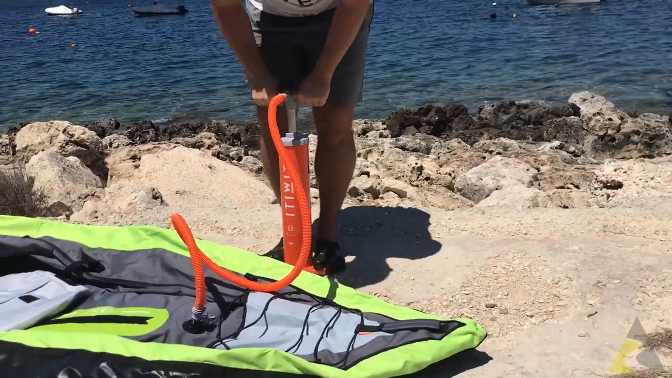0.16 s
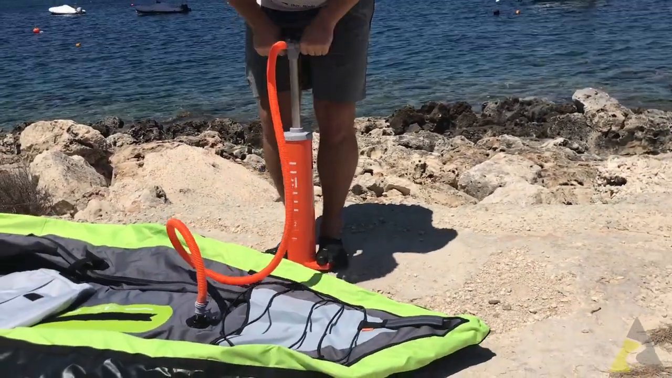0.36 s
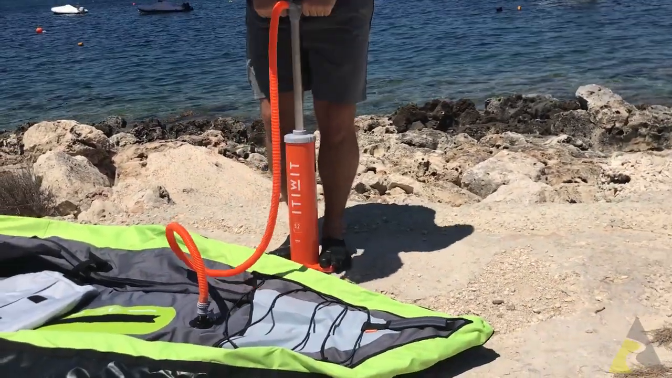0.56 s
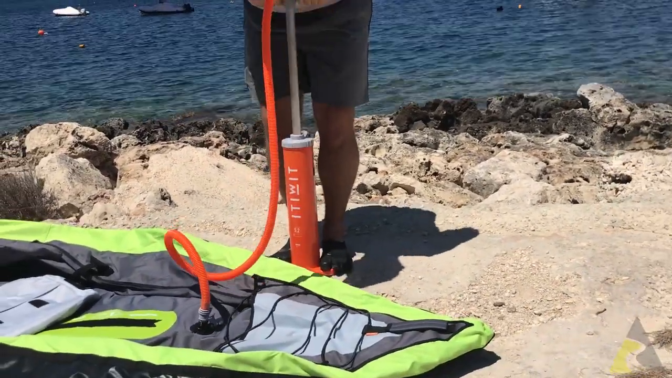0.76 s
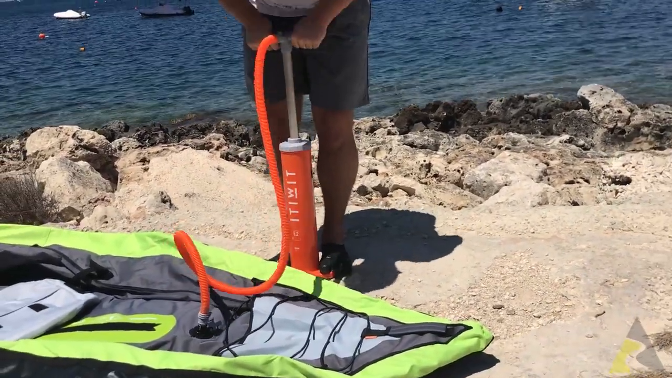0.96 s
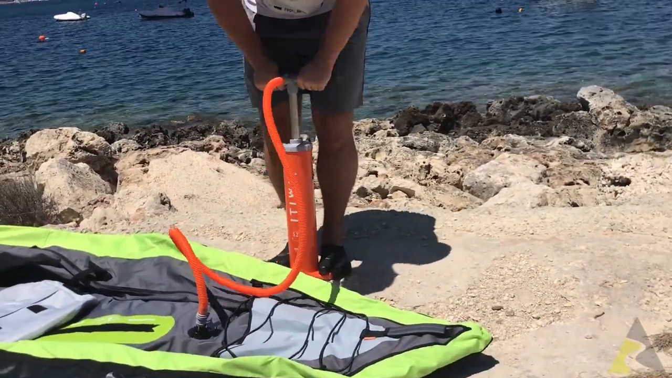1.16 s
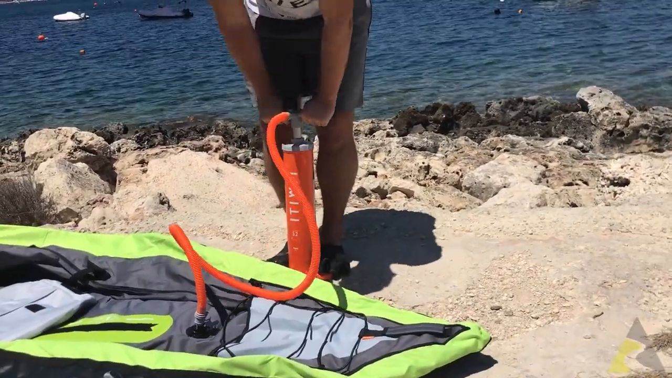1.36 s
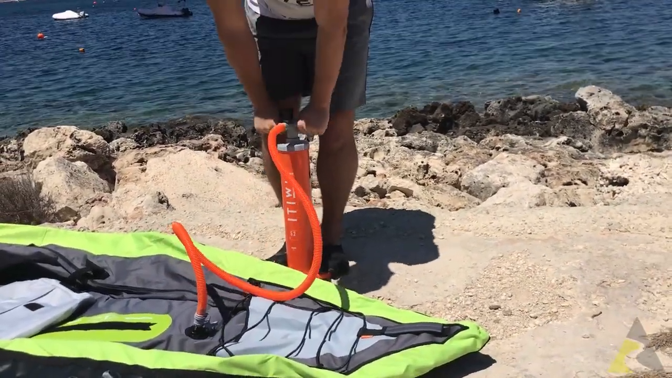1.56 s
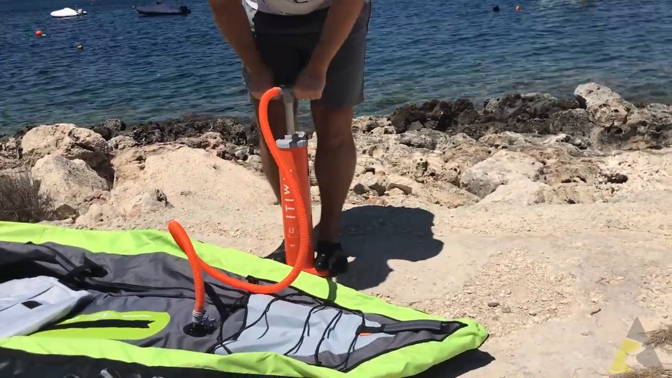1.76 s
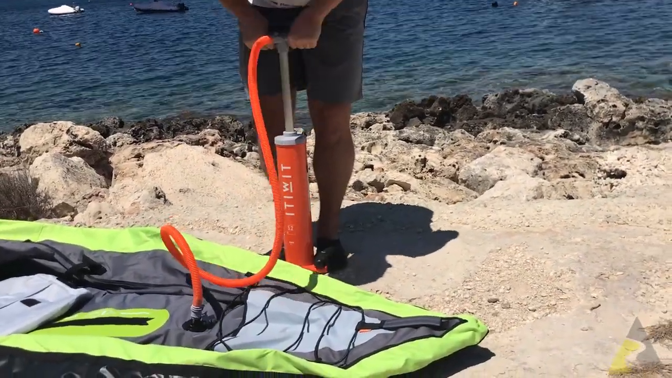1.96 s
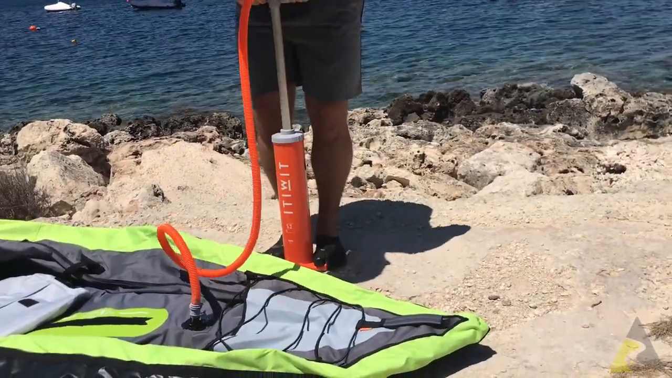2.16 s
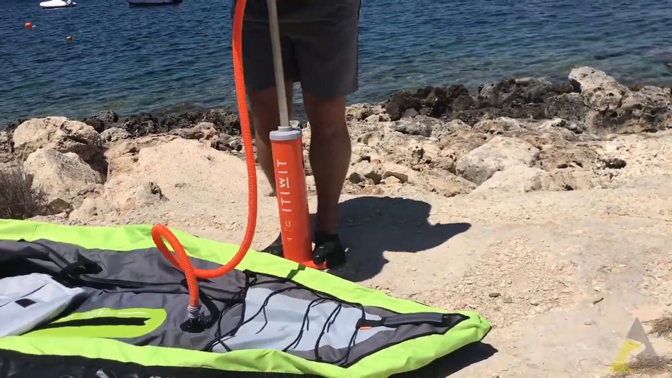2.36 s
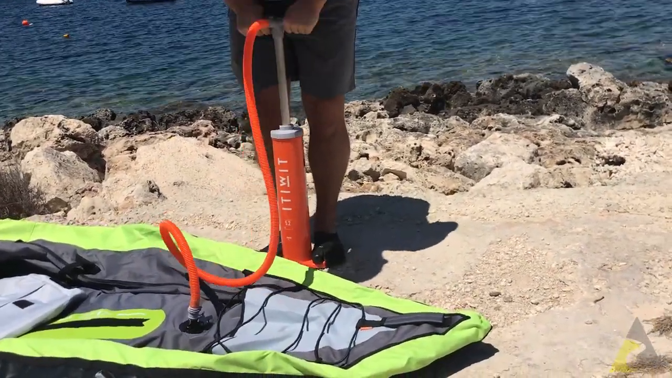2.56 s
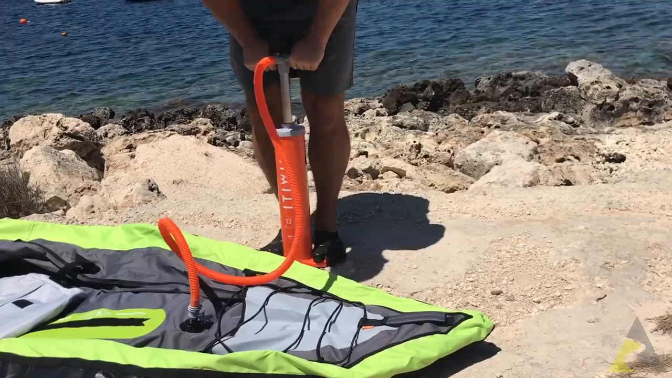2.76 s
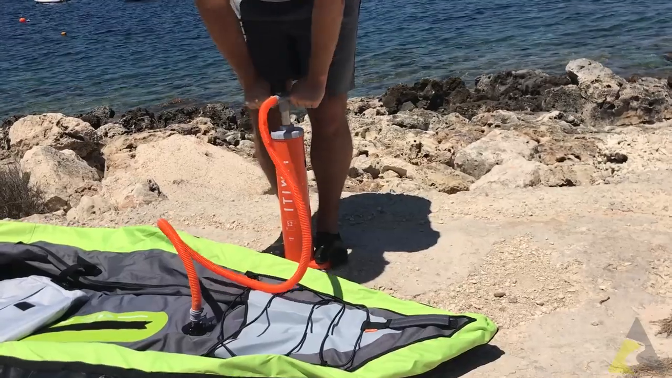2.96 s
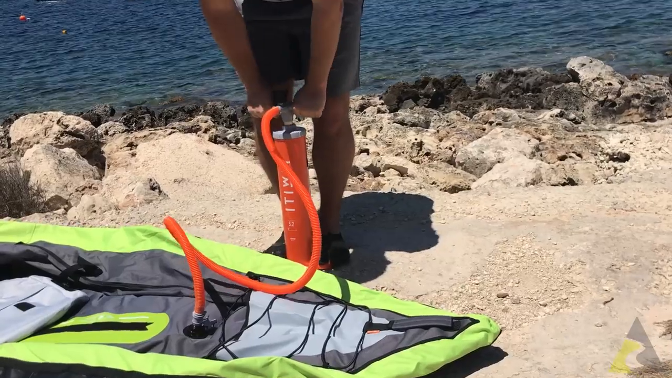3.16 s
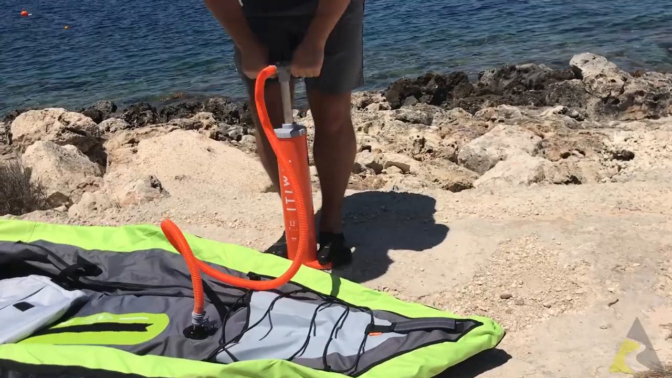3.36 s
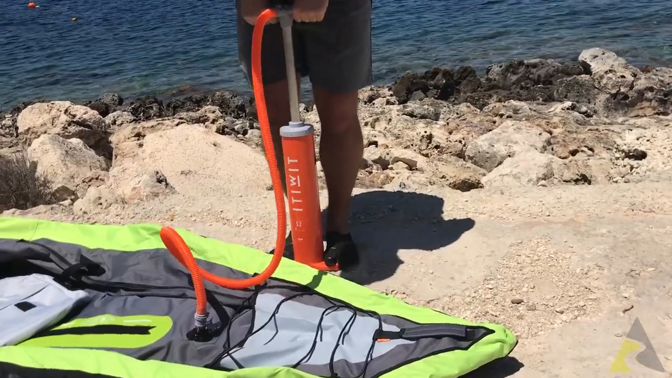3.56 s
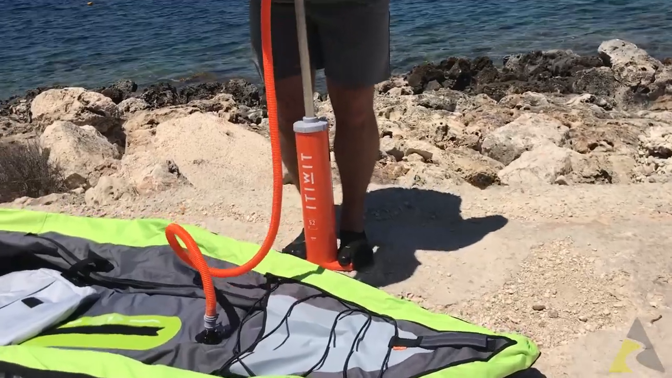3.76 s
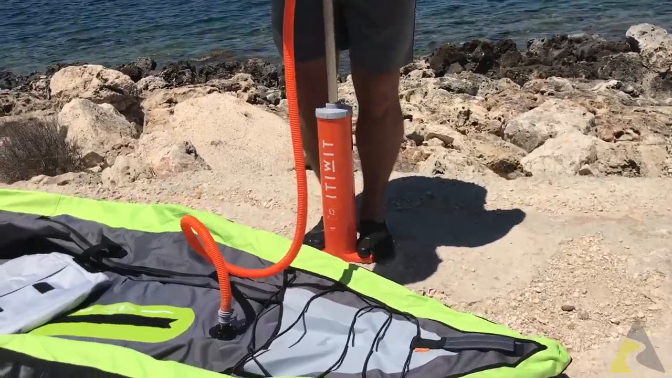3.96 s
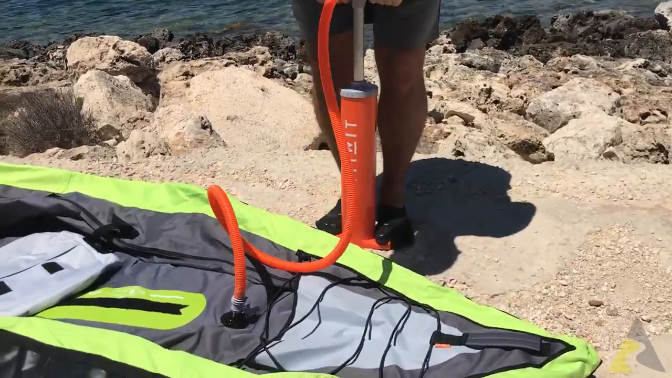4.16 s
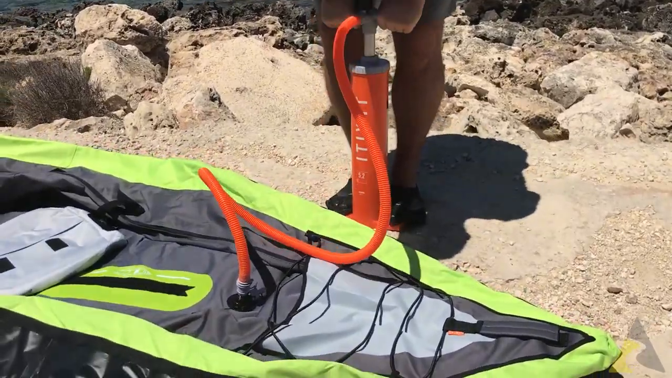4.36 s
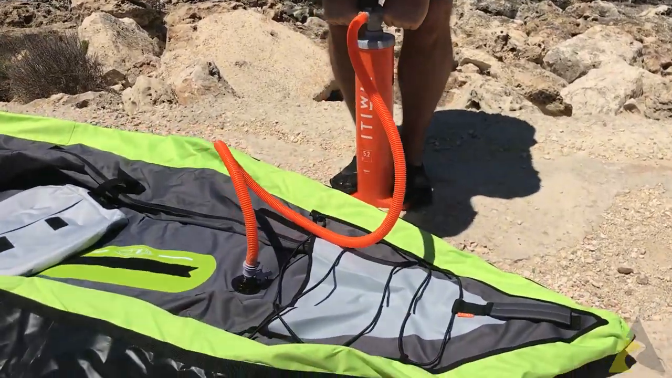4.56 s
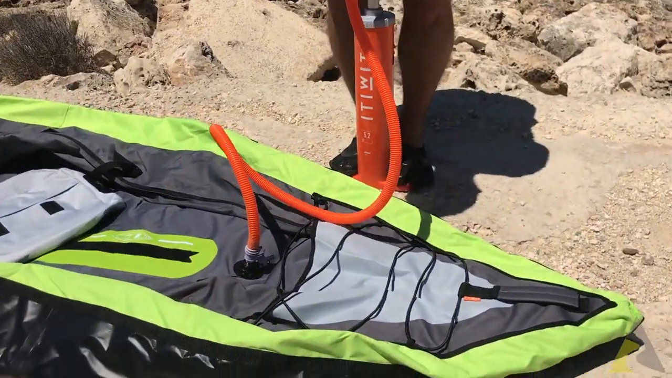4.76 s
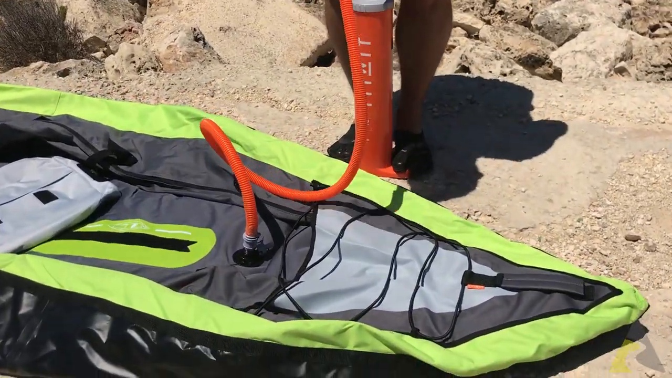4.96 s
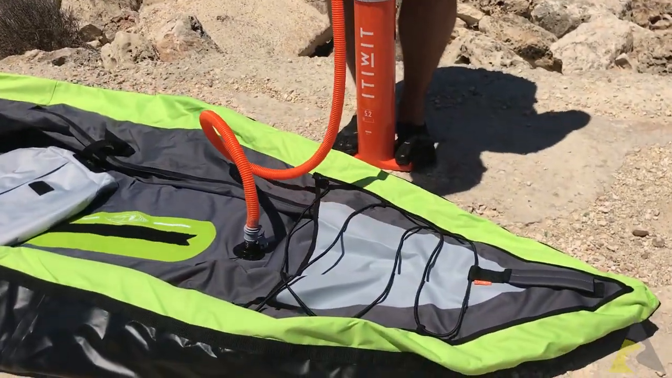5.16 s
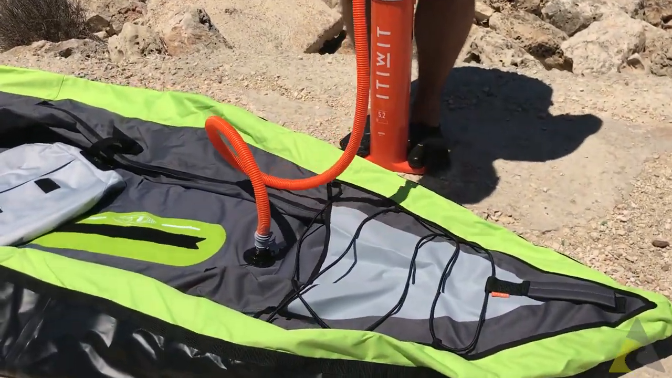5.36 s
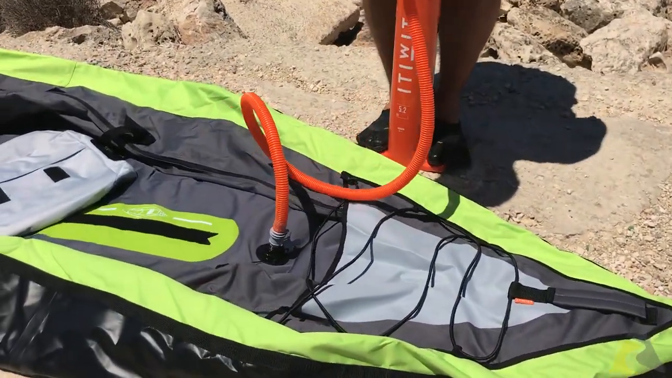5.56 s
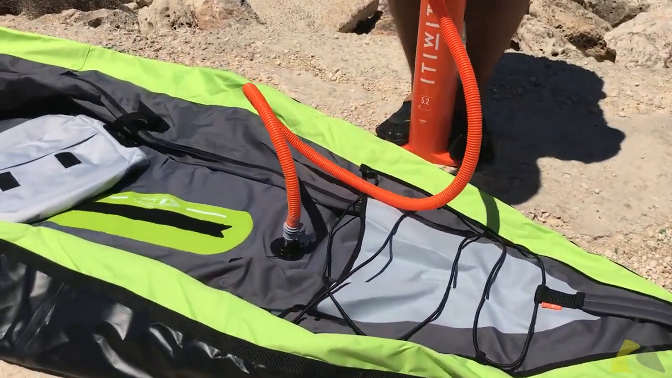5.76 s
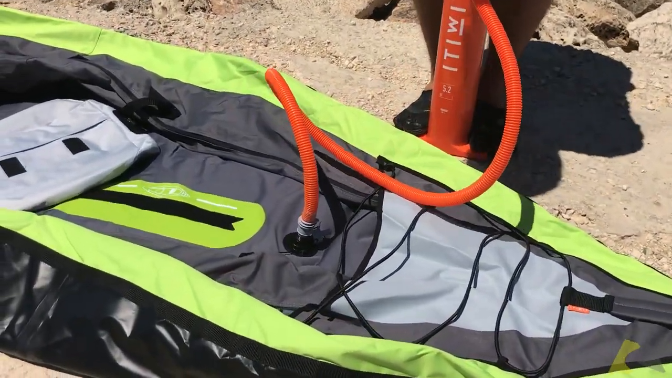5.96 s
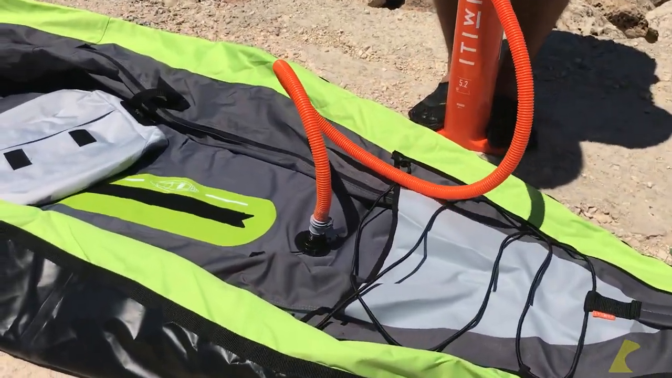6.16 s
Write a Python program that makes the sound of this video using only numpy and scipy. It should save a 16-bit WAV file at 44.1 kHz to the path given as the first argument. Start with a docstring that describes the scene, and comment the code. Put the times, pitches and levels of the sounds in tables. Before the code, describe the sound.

A hand pump fills an inflatable boat with steady, whistling hisses of air and light knocks, as wind rumbles on the microphone.

```python
"""A double-action hand pump fills an inflatable boat on a breezy shore, heard by one microphone.
Every push and pull drives air through the hollow piston rod and a flap valve. Swirls of air (eddies)
make the rod sing like a pipe, over hiss and brief whistles. The flap ticks shut and pops open, and the
piston knocks at the ends of its travel. Wind buffets the microphone over a faint wash of sea."""
import sys
import numpy as np
from scipy import signal
from scipy.fft import rfft, irfft
from scipy.io import wavfile
from scipy.ndimage import uniform_filter1d, map_coordinates

SR = 44100
rng = np.random.default_rng(int(sys.argv[2]) if len(sys.argv) > 2 else 0)


def wav_out(sig):
    """Save sig, one row per channel (or a flat mono array), as 16-bit PCM at SR to the path in sys.argv[1]."""
    wavfile.write(sys.argv[1], SR, np.round(np.clip(np.atleast_2d(sig).T, -1, 1) * 32767).astype(np.int16))


N = 273420

# One row a stroke, pushes and pulls in turn. "Jet" is the fast stream of air.
# (piston starts [s], valve opens [s], hardest effort [s], easing off [s], piston stops [s],
#  jet at opening [dB], jet at hardest [dB], jet at easing off [dB], jump at opening [dB],
#  base eddy pitch [Hz], pressure peak [s], fizz at that peak relative to the jet [dB],
#  brightness at opening [dB], brightness at easing off [dB], barrel noise [dB], puff near the top [dB])
STROKES = [ (-.8, -.7, -.3, 0.0, .05, -39, -33, -40, 0, 3200, -.3, -6, -6, -8, -50, -47),
           (.1, .187, .41, .72, .89, -36, -32.5, -37.5, 33, 3400, .4, -8.5, -5.5, -6, -50, -42),
           (.9, .984, 1.17, 1.5, 1.71, -38.5, -36, -41.5, 15, 3050, 1.3, -5, -9, -6.5, -51, -49),
           (1.7, 1.747, 2.0, 2.28, 2.43, -37.5, -32, -35, 28, 3330, 2.0, -10.5, -6.5, -6, -51, -47),
           (2.46, 2.54, 2.72, 3.08, 3.28, -40, -38.5, -39.5, 6, 3250, 3.02, -1, -7.5, -6.5, -52, -50),
           (3.28, 3.337, 3.6, 3.82, 3.99, -34.5, -32, -33.5, 30, 3450, 3.52, -7, -3, -6, -50, -42),
           (3.985, 4.06, 4.46, 4.61, 4.67, -38.5, -32.5, -40, 2, 3380, 4.4, -5.5, -4, -10, -48.5, -45),
           (4.72, 4.777, 5.12, 5.28, 5.44, -33, -31, -37.5, 30, 3400, 5.05, -5.5, -6, -5, -47, -42),
           (5.405, 5.48, 5.66, 6.0, 6.06, -39.5, -32, -36, 0, 3200, 5.65, -4.5, -5, -8, -47, -45),
           (6.12, 6.194, 6.4, 6.7, 6.9, -35, -32, -36, 26, 3200, 6.4, -9, -7, -6, -49, -43), ]
# Tone colour of the air jet: (frequency [Hz], level [dB])
JET_SPECTRUM = [(650, -54), (1100, -19.5), (1580, -37), (1980, -8), (2160, -12.5), (2390, -3), (2890, -5),
                (3180, -5), (3990, -3), (4780, -6), (6470, -5.5), (10600, -16), (13800, -13), (22000, -120)]

ROD_HZ, MODE_WIDTH_HZ = 297.5, 75   # spacing and width of the rod's modes, the pitches it rings at


def from_db(db):
    """Turn decibels into a number to multiply a sound by."""
    return 10 ** (np.asarray(db) / 20)


def rms_one(x):
    """Scale a signal so that its average strength (rms) is 1."""
    return x / np.sqrt(np.mean(x ** 2) + 1e-20)


def bump(at_s, width_s):
    """A bell-shaped curve in time, of height 1."""
    return np.exp(-.5 * ((np.arange(N) / SR - at_s) / width_s) ** 2)


def drift(rate_hz):
    """A smooth random wander of strength about 1; a higher rate wanders faster."""
    step = 40   # samples between random values
    r = np.exp(-2 * np.pi * step * rate_hz / SR)
    slow = signal.lfilter([1], [1, -2 * r, r * r], rng.standard_normal(N // step + 2002))[2000:]
    return np.interp(np.arange(N) / step, np.arange(len(slow)), rms_one(slow))


def turbulence(spectrum, flicker_db, bands):
    """Churning air or water: coloured noise whose bands flicker, partly together and partly alone."""
    hz, level_db = np.transpose(spectrum)
    bin_hz = np.arange(N // 2 + 1) * SR / N + 1e-3
    colour = from_db(np.interp(np.log(bin_hz), np.log(hz), level_db, -90, -90))
    shaped = rfft(rng.standard_normal(N)) * colour
    band_position = bands * np.log(bin_hz / hz[0]) / np.log(hz[-1] / hz[0])
    out, together = 0, drift(11.1)
    for k in range(bands + 1):
        band = irfft(shaped * np.clip(1 - abs(band_position - k), 0, 1), N)
        flicker = .3 * together + .7 * drift(5) + .7 * drift(18)
        out = out + band * from_db(flicker_db * flicker)
    return rms_one(out)


def ring(drive, hz, ring_s):
    """A resonance: each click in the drive starts a tone that fades by 60 dB in ring_s seconds."""
    r, w = from_db(-60 / (ring_s * SR)), 2 * np.pi * hz / SR
    return signal.lfilter([0, np.sin(w)], [1, -2 * r * np.cos(w), r * r], drive + 1e-18)


def add(out, at_s, sound):
    """Mix a short sound in at a given time."""
    i = round(at_s * SR)
    out[i:i + len(sound)] += sound[:N - i]


def sea():
    """Water washing on the shore makes a faint, wavering noise."""
    # Tone colour of the sea: (frequency [Hz], level [dB])
    wash_spectrum = [(120, -38), (200, -4.5), (456, -11.5), (538, -11), (735, -7.5), (836, -17),
                     (16000, -37)]
    return from_db(-56.5) * turbulence(wash_spectrum, flicker_db=3.0, bands=6)


def wind():
    """Wind shakes the air pressure at the microphone: a lumpy rumble with a few single thumps."""
    # Strength of the breeze: (time [s], level [dB])
    breeze = [(0, -43), (.08, -54), (.17, -37), (.4, -40), (.5, -51), (.82, -45), (1.28, -49), (1.76, -43),
              (1.93, -35), (2.07, -37), (2.28, -49), (2.84, -43), (3.2, -38), (3.29, -50), (3.4, -47),
              (3.57, -34), (3.8, -49), (4.4, -48), (4.8, -44), (5.2, -50), (5.33, -38), (5.55, -49),
              (5.92, -55), (6.2, -45)]
    # Short gusts that thump: (time [s], rise above the breeze [dB])
    gusts = [(.03, 8), (1.8, 8), (2.23, 6), (2.52, 7), (2.64, 5), (3.325, 12), (3.44, 21), (4.12, 11),
             (5.49, 7)]
    # Tone colour of the rumble: (frequency [Hz], level [dB])
    rumble_spectrum = [(13, -44), (22, -14), (71, 4.5), (139, -5), (198, -10), (300, -24), (520, -34),
                       (880, -120)]
    breeze_db = np.interp(np.arange(N) / SR, *np.transpose(breeze))
    gust_db = sum(db * bump(at_s, width_s=.015) for at_s, db in gusts)
    return from_db(breeze_db + gust_db) * turbulence(rumble_spectrum, flicker_db=2.5, bands=3)


def whistles():
    """Air whistles on its way through the pump: nearly pure tones that swell, waver and fade."""
    # Brief whistles: (start [s], end [s], pitch [Hz], level [dB])
    tones = [(3.1, 3.3, 5100, -59), (3.1, 3.34, 5250, -63), (3.11, 3.2, 9530, -54), (3.1, 3.22, 9750, -56),
             (3.92, 4.08, 5250, -59), (3.92, 4.03, 9750, -67), (4.385, 4.5, 3215, -28),
             (4.37, 4.41, 3560, -32), (3.5, 3.66, 3500, -31), (.36, .5, 3570, -34), (.6, .72, 3400, -36),
             (2.93, 3.06, 3570, -38), (1.93, 2.06, 3290, -34), (5.08, 5.2, 3560, -33),
             (4.45, 4.6, 6340, -47), (5.05, 5.2, 3125, -35), (5.68, 5.95, 3124, -33),
             (5.74, 5.92, 6340, -42)]
    out = np.zeros(N)
    waver, strength = 1 + .0032 * drift(31), from_db(1.5 * drift(30))
    for start, end, hz, level_db in tones:
        on = slice(round(start * SR), round(end * SR))
        tone = strength[on] * np.sin(2 * np.pi * np.cumsum(hz * waver[on]) / SR)
        add(out, start, from_db(level_db) * tone * signal.windows.tukey(len(tone), .6))
    return out


def valve_flap():
    """The flap ticks shut with a short ring, and bursts open with a low pop of air."""
    # The flap closing: (time [s], level [dB], pitch [Hz])
    ticks = [(0.143, -42.5, 1040), (0.897, -47, 972), (1.716, -35, 1025), (2.424, -46, 880),
             (3.99, -48, 1400), (4.741, -39.5, 1120), (5.416, -45, 1360), (6.14, -40.5, 1090)]
    # The flap opening: (time [s], level [dB])
    pops = [(0.182, -28.5), (0.984, -41), (1.742, -29), (3.332, -54), (4.774, -36.5), (6.192, -28.5)]
    out, click = np.zeros(N), signal.unit_impulse(SR // 10)
    soft_click = signal.lfilter([.12], [1, -.88], click)
    for at_s, level_db, hz in ticks:
        body = ring(soft_click, hz, .035) - .6 * ring(soft_click, 1.2 * hz, .03)
        snap = .15 * ring(click, 2.3 * hz, .012)
        add(out, at_s, from_db(level_db + 5) * (body + snap))
    pop = ring(ring(click, hz=420, ring_s=.008), hz=420, ring_s=.008)
    for at_s, level_db in pops:
        add(out, at_s + .0013, -from_db(level_db + 4) * pop / pop.max())   # minus: it starts with a dip
    return out


def piston_knocks():
    """The piston hits its stop: a sharp crack first, then the barrel's low tones a moment later."""
    # Hits on the stop: (time [s], level [dB], brightness added to the high tones [dB])
    hits = [(0.0, -22.5, 1), (0.805, -32, -47), (1.608, -33, -19), (2.334, -27.5, -15), (3.906, -33, -16.5),
            (4.621, -20.5, -6), (6.005, -14, -7)]
    # Tones the barrel rings at: (pitch [Hz], level [dB], ring time [s])
    barrel_modes = [(319, -3, 0.016), (571, -0.5, .022), (1037, -5, 0.018), (1590, 6, 0.012),
                    (2340, 12, 0.0065), (3205, 12, 0.004), (6300, 3, 0.014)]
    out, blow = np.zeros(N), np.zeros(SR // 8)
    blow[:8] = np.hanning(10)[1:-1] / 4.5
    blow[46:54] = .6 * blow[:8]   # the piston bounces once, a millisecond later
    for at_s, level_db, bright_db in hits:
        for k, (hz, mode_db, ring_s) in enumerate(barrel_modes):
            is_high = hz > 1500
            delay_s = .0006 if is_high else .0017
            gain = (-1) ** k * from_db(level_db + mode_db + bright_db * is_high)
            add(out, at_s + delay_s, gain * ring(blow, hz, ring_s))
    return out


def handle_height():
    """The handle moves between 0 (down) and 1 (up), turning in the gap between two strokes."""
    starts, stops = [row[0] for row in STROKES], [row[4] for row in STROKES]
    turns = [(stop + start) / 2 for stop, start in zip(stops, starts[1:])] + [stops[-1]]
    return np.interp(np.arange(N) / SR, turns, np.arange(len(turns)) % 2)


def ground_echo(sound, share):
    """Add a dull copy that bounces off the ground and arrives later when the handle is high."""
    down_ms, up_ms = 1.34, 2.7
    lag = (down_ms + (up_ms - down_ms) * handle_height()) * SR / 1000
    dull = signal.sosfilt(signal.butter(1, 7000, fs=SR, output="sos"), sound)
    return sound + share * map_coordinates(dull, [np.arange(N) - lag], order=3)


def pumping():
    """The strokes set the jet's level and eddy pitch, and four more levels relative to the jet."""
    still_db, jump_s, burst_s = -80.0, .004, .01   # jet at rest; valve opening time; fade of its burst
    leak_power, slowing_power = 1.3, 2.0   # how steeply the jet follows the piston's start and stop
    drain_drop_db, drain_db_per_s = 13, 135
    eddy_hz_per_db, eddy_travel_hz, eddy_lowest_hz = 22, 500, 2800
    fizz_open_db, fizz_sag_db, fizz_rest_db = -16, 2.0, -11
    leak_bright_db, push_bright_db, pull_bright_db = -2, -5, -3.5   # a pull bites harder at its peak
    burst_hz, burst_fizz_db, burst_rush_db = 400, 7, 10   # brief lifts as the valve flies open
    t, height = np.arange(N) / SR, handle_height()
    jet_db, hardest_db, eddy_hz, bright_db, fizz_db, barrel_db, pushing = np.full((7, N), still_db)
    puff_power, bursts = np.zeros((2, N))
    for k, (start, opens, hard, ease, stop, open_db, hard_db, ease_db, jump_db, base_hz, peak,
            peak_fizz_db, bright_open_db, bright_ease_db, low_db, puff_db) in enumerate(STROKES):
        on, pull = t >= start, k % 2
        lifts = opens - jump_s

        # Air gathers pace until the valve opens, dies as the piston slows, and drains from the hose.
        leak = np.clip((t - start) / (opens - start), 1e-4, 1)
        speed = np.clip((stop - t) / (stop - ease), 1e-4, 1)
        level_db = np.interp(t, [lifts, opens, hard, ease], [open_db - jump_db, open_db, hard_db, ease_db])
        level_db += 20 * np.log10(leak ** leak_power * speed ** slowing_power)
        drain_db = np.where(t > ease, ease_db - drain_drop_db - drain_db_per_s * (t - ease), still_db)
        level_db = np.maximum(level_db, drain_db)
        jet_db = np.maximum(jet_db, level_db)

        # The eddy pitch rises with a stronger jet, a higher handle and the opening burst.
        burst = (t >= lifts) * np.exp(-np.maximum(t - opens, 0) / burst_s)
        pitch_hz = base_hz + eddy_hz_per_db * (level_db - hard_db) + eddy_travel_hz * (height - .5)
        eddy_hz[on] = np.maximum(pitch_hz + burst_hz * burst, eddy_lowest_hz)[on]

        # The fizz grows, quickly at first, up to the pressure peak.
        rise = np.clip((t - opens) / (peak - opens), 0, 1) ** .6
        sag_db = np.interp(t, [peak, ease, stop], [0, -fizz_sag_db, fizz_rest_db - peak_fizz_db])
        fizz_db[on] = (fizz_open_db + (peak_fizz_db - fizz_open_db) * rise + sag_db)[on]

        bright_peak_db = pull_bright_db if pull else push_bright_db
        bright_steps_db = [leak_bright_db, bright_open_db, bright_peak_db, bright_ease_db]
        bright_db[on] = np.interp(t, [lifts, opens, peak, ease], bright_steps_db)[on]
        hardest_db[on], barrel_db[on], pushing[on] = hard_db, low_db, 1 - pull
        bursts += pull * burst

        # A puff comes near the top of the travel: late in a pull, early in a push.
        puff = bump(stop - .12, width_s=.034) if pull else on * bump(start + .03, width_s=.034)
        puff_power += from_db(2 * puff_db) * puff

    swing_db = jet_db - hardest_db   # the whoosh and the rush follow only part of this swing
    whoosh_db = barrel_db - 2.5 + .4 * swing_db
    whoosh_db = 10 * np.log10(from_db(2 * whoosh_db) + puff_power)
    rush_db = barrel_db + .35 * swing_db + 2.0 * pushing + burst_rush_db * bursts
    fizz_db += burst_fizz_db * bursts
    return jet_db, eddy_hz, bright_db, whoosh_db - jet_db, rush_db - jet_db, fizz_db


def valve_fizz(fizz_db):
    """A fine hiss; under pressure the valve gap rings out of it, a little higher on the push."""
    # Tone colour of the hiss: (frequency [Hz], level [dB])
    hiss_spectrum = [(5760, -20), (9800, -2), (10300, -11.5), (11000, -3), (12600, -3.5), (16000, -8.5)]
    pull_hz, push_hz, ring_s = 12120, 12420, .0011
    pulling = np.gradient(handle_height()) > 0
    noise = rng.standard_normal(N)
    on_pull, on_push = (rms_one(ring(ring(noise, hz, ring_s), hz, ring_s)) for hz in (pull_hz, push_hz))
    hiss = turbulence(hiss_spectrum, flicker_db=1.7, bands=3)
    gap_tone = from_db(2.2 * drift(8.2)) * np.where(pulling, on_pull, on_push)
    tone_share = np.clip((fizz_db + 10.5) / 14, 0, .7)
    return from_db(fizz_db) * (np.sqrt(1 - tone_share) * hiss + np.sqrt(tone_share) * gap_tone)


def rod_modes(eddy_hz, first, count, flicker_db, boost_db):
    """Each pipe tone of the rod rings on its own noise, wavers, and swells near the eddy pitch."""
    jet_hz, jet_db = np.transpose(JET_SPECTRUM)
    out, ring_s = 0, np.log(1000) / (np.pi * MODE_WIDTH_HZ)
    for hz in ROD_HZ * (first + np.arange(count)):
        nearness = np.exp(-.5 * ((hz - eddy_hz) / 450) ** 2)
        base_db = np.interp(np.log(hz), np.log(jet_hz), jet_db)
        gain_db = base_db + boost_db * nearness + flicker_db * np.tanh(drift(9.1))
        out = out + from_db(gain_db) * ring(rng.standard_normal(N), hz, ring_s)
    return out


def barrel_noise(jet_db, whoosh_db, rush_db):
    """Air rushes in the barrel, and large, slow eddies add a whoosh that sinks as the jet weakens."""
    # Tone colour of the rush: (frequency [Hz], level [dB])
    rush_spectrum = [(130, -22), (220, -8), (323, -4.5), (903, -1.5), (998, -3), (1200, -9), (1560, -5),
                     (2640, -120)]
    full_jet_hz, hz_per_db = 1950, 35
    eddy_hz = np.maximum(full_jet_hz + hz_per_db * (jet_db - jet_db.max()), 4 * ROD_HZ)
    band_filter = signal.butter(2, [1150, 2150], "band", fs=SR, output="sos")
    breath = signal.sosfilt(band_filter, rng.standard_normal(N))
    tones = rms_one(rod_modes(eddy_hz, first=4, count=3, flicker_db=4.0, boost_db=8.0))
    whoosh = rms_one(rms_one(breath) + .9 * tones)
    rush = turbulence(rush_spectrum, flicker_db=2.0, bands=5)
    return from_db(whoosh_db) * whoosh + from_db(rush_db) * rush


def air_jet(eddy_hz, bright_db):
    """Eddies make the hollow rod sing over broad jet noise, in a middle and a treble layer."""
    noise_bins = rfft(turbulence(JET_SPECTRUM, flicker_db=4.0, bands=6))
    bin_hz = np.arange(N // 2 + 1) * SR / N
    treble_share = np.clip((bin_hz - 4500) / 400, 0, 1)
    tones = rod_modes(eddy_hz, first=8, count=8, flicker_db=4.5, boost_db=9.0)
    tones /= np.sqrt(uniform_filter1d(tones ** 2, size=5000))   # the colour shifts, not the loudness
    middle = .88 * tones + .47 * rms_one(irfft(noise_bins * (1 - treble_share), N))
    high_tones = rms_one(rod_modes(1.8 * eddy_hz, first=16, count=14, flicker_db=7.0, boost_db=4.0))
    treble = .8 * high_tones + .6 * rms_one(irfft(noise_bins * treble_share, N))
    return middle + from_db(bright_db) * treble


def airflow():
    """The pump's breath: the jet sings, the barrel rushes below it and the valve gap fizzes above."""
    jet_db, eddy_hz, bright_db, whoosh_db, rush_db, fizz_db = pumping()
    jet = ground_echo(air_jet(eddy_hz, bright_db), share=.45)
    barrel = ground_echo(barrel_noise(jet_db, whoosh_db, rush_db), share=.3)
    return from_db(jet_db) * (jet + barrel + valve_fizz(fizz_db))


def scene():
    """Sea, pump and wind reach a single microphone, so both channels are alike."""
    shore = sea()
    pump = airflow() + whistles() + piston_knocks() + valve_flap()
    return np.tile(pump + wind() + shore, (2, 1))


def record(dry):
    """A steep filter cuts off the very highest treble."""
    cutoff_hz = 15850
    return signal.sosfilt(signal.ellip(14, .3, 70, cutoff_hz, fs=SR, output="sos"), dry)


dry = scene()
out = record(dry)
wav_out(out)
```